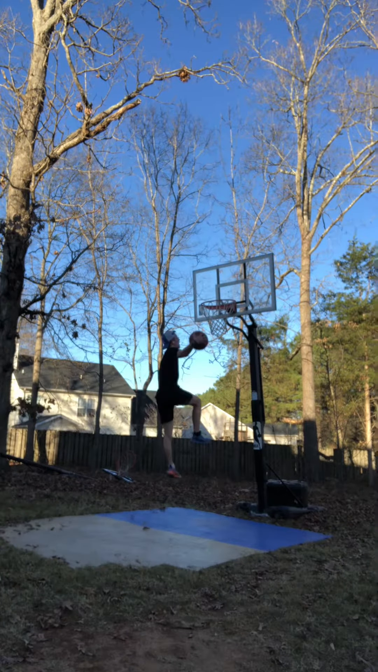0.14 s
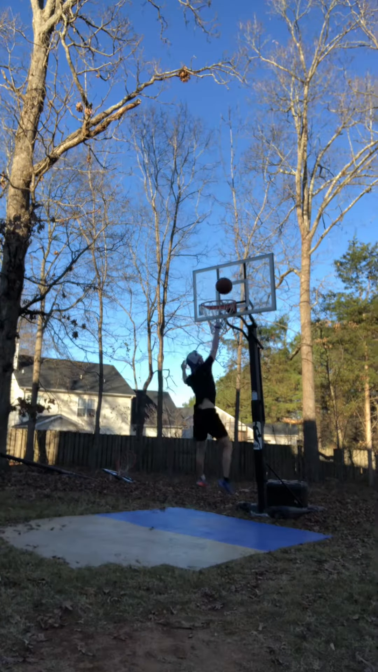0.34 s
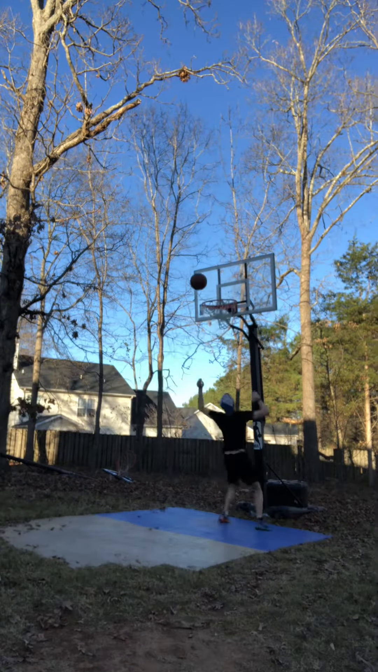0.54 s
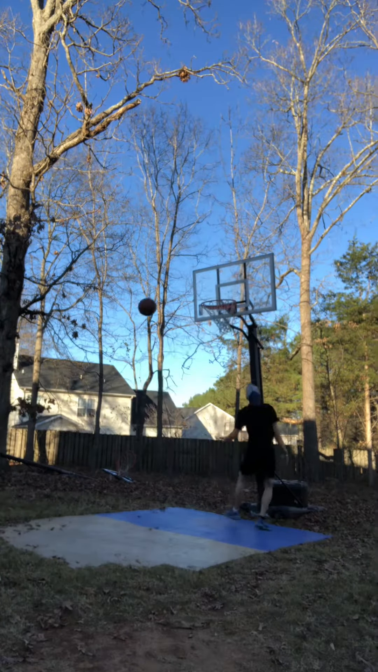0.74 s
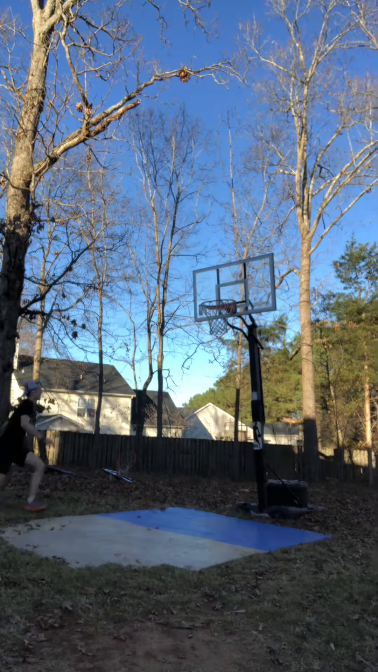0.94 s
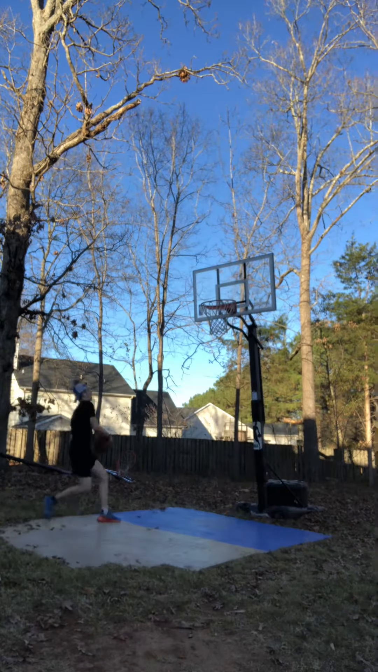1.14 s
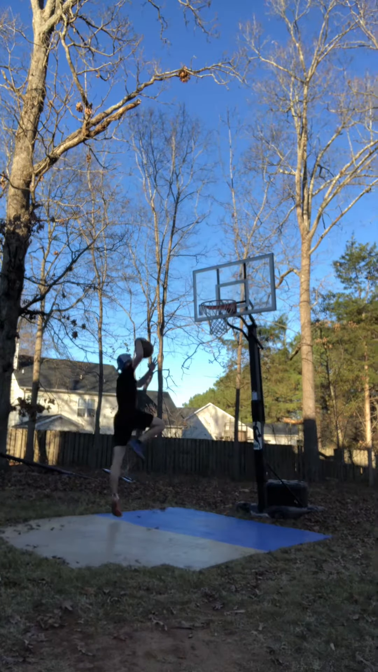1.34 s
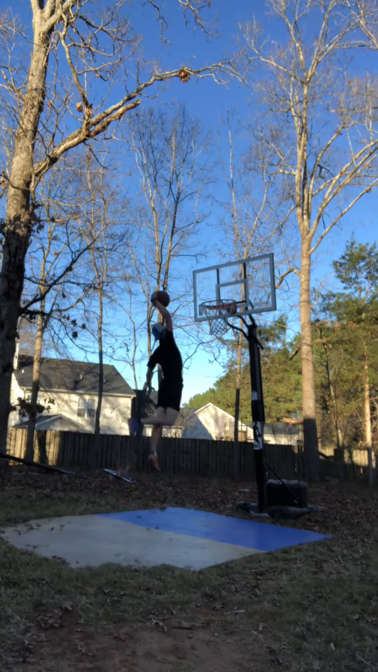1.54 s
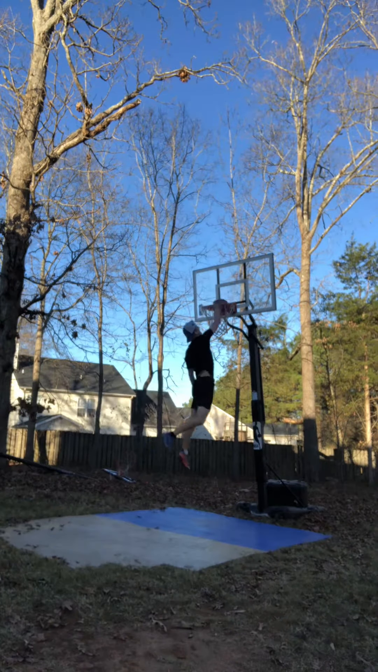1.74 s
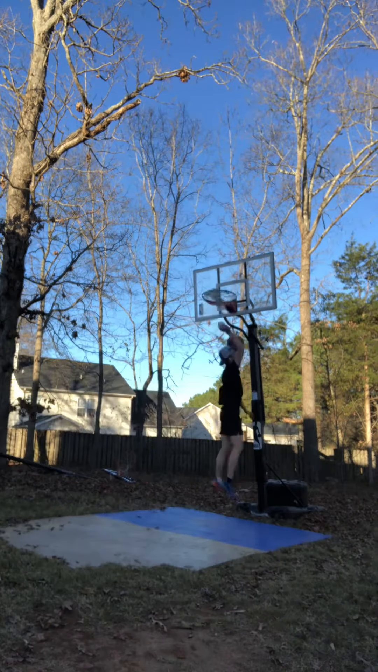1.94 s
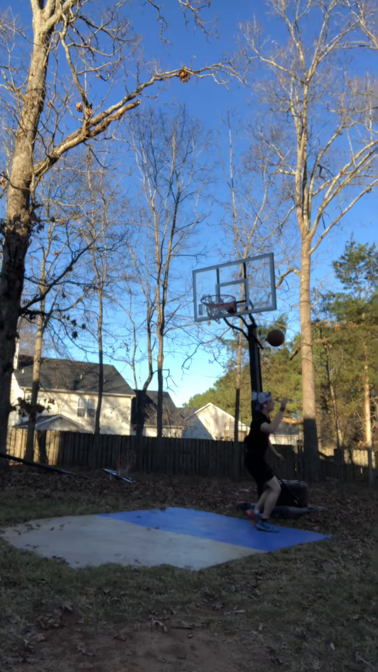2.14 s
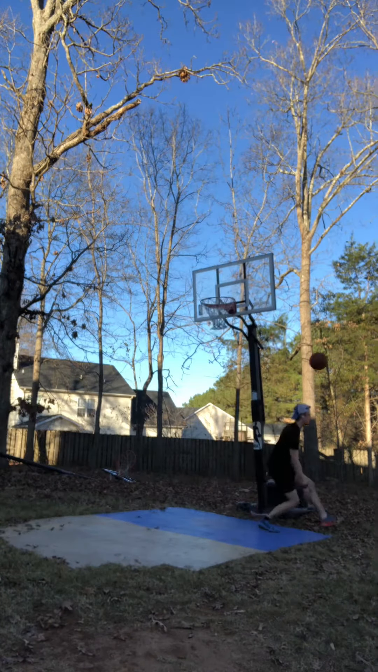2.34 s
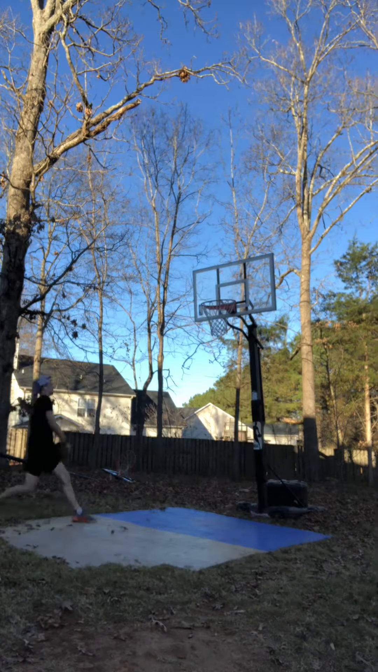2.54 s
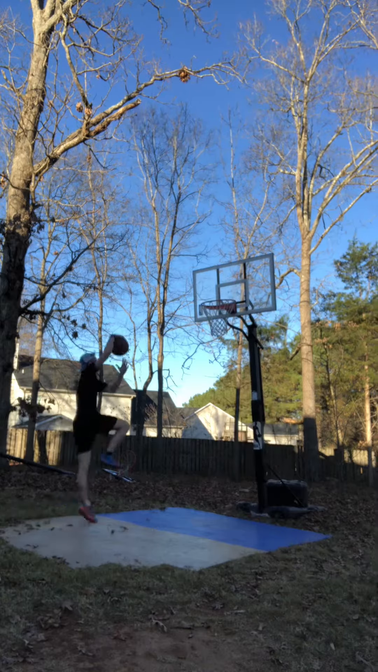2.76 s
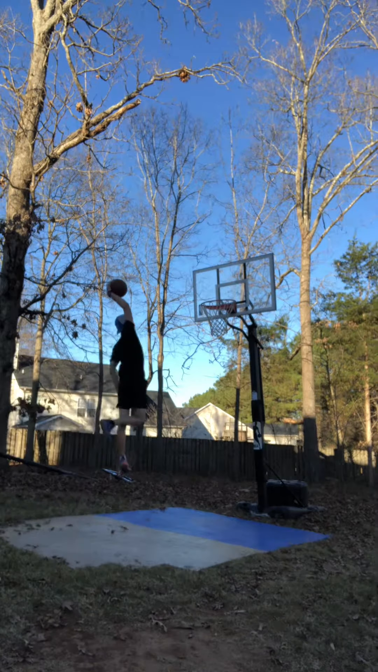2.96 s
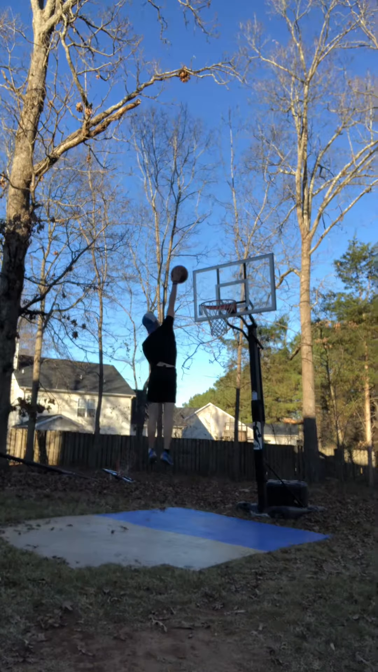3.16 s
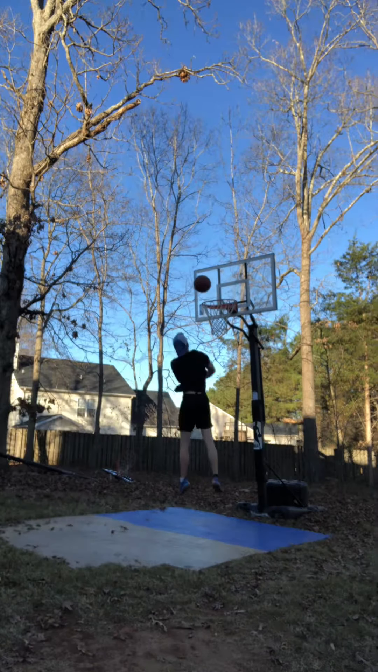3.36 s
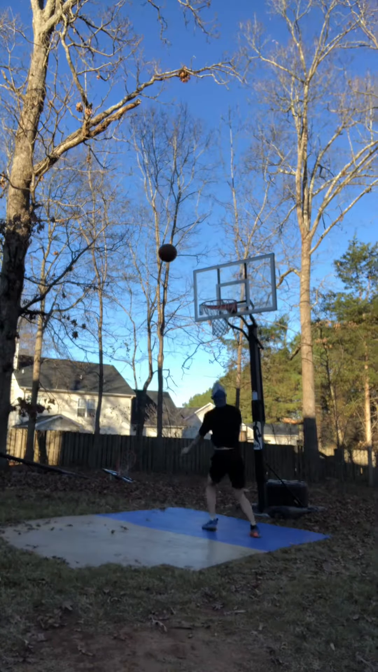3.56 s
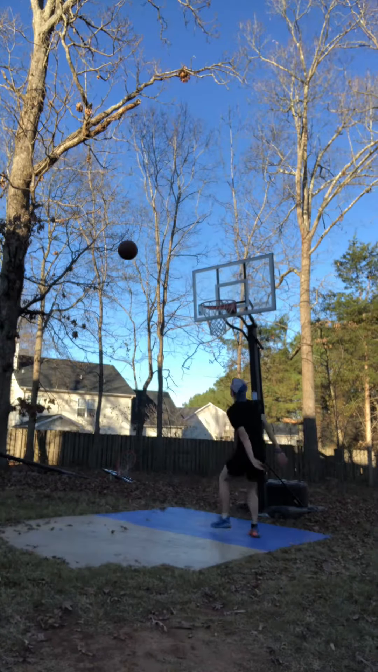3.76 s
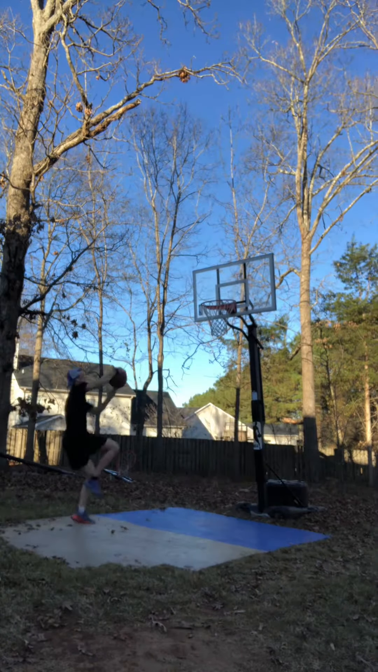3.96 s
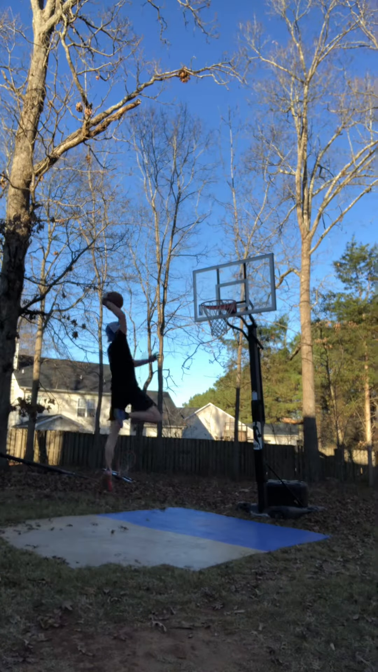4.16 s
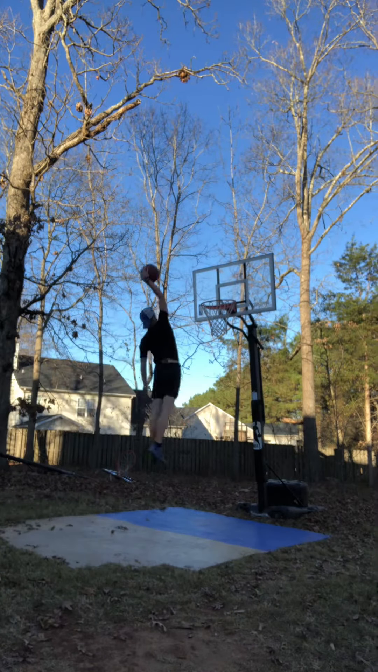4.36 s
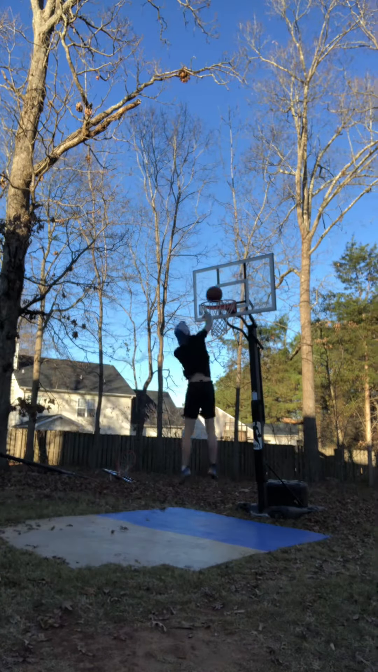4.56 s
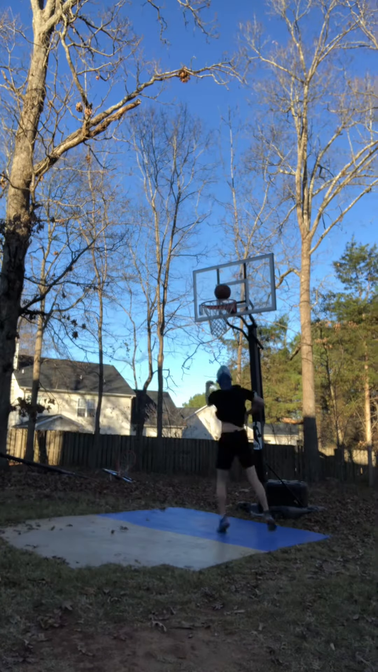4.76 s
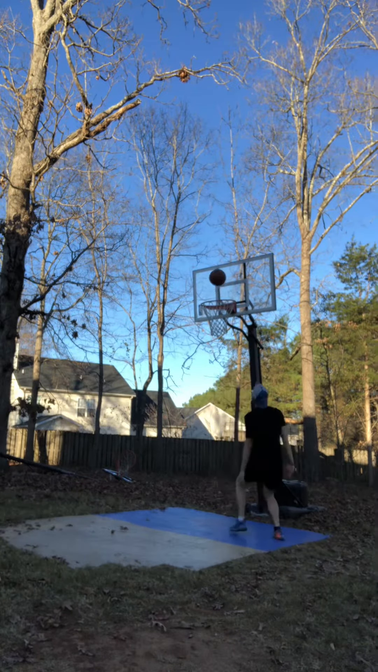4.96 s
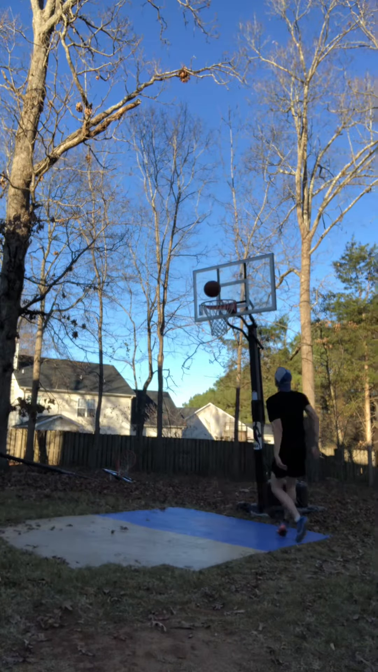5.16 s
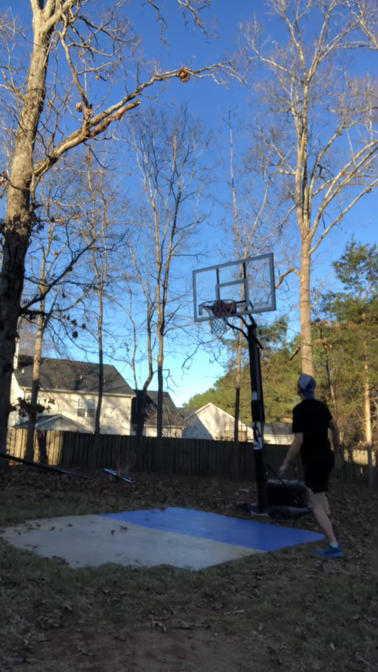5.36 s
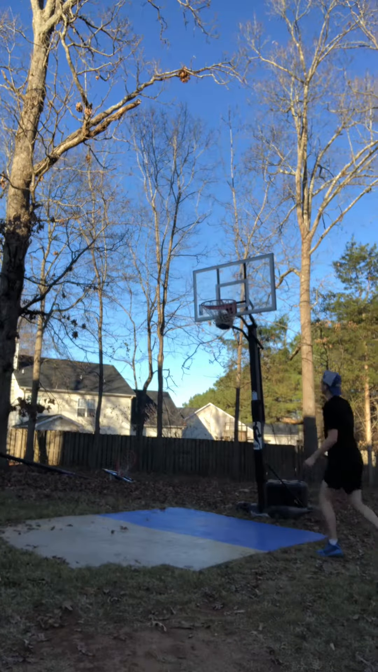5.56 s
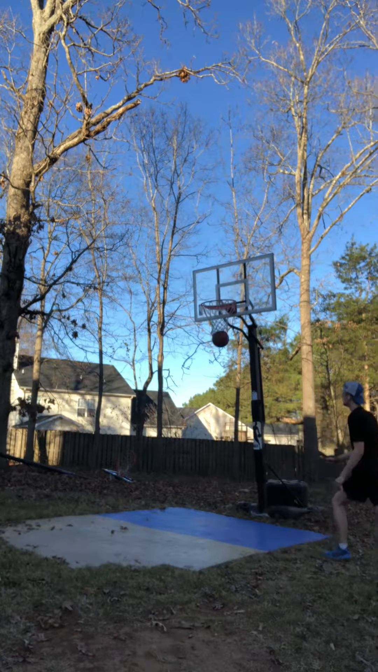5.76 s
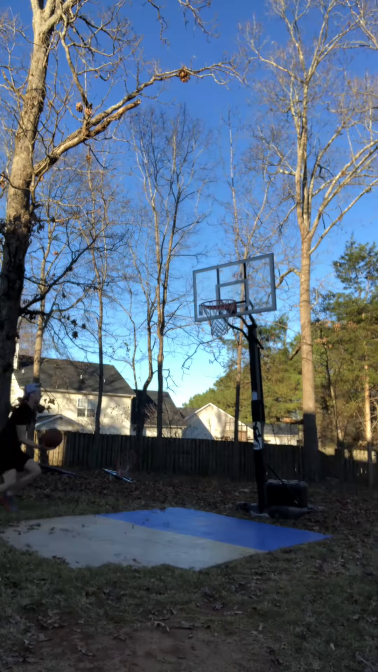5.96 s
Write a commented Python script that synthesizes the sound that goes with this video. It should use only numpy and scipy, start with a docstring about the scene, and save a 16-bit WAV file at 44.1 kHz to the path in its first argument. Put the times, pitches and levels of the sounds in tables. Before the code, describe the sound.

In a backyard, a ball repeatedly slams a steel rim and booming board, loose parts rattling on, with leaf-crunching run-ups abruptly cut between.

```python
"""A yard: a ball strikes a portable hoop. Ball and hand hit the steel rim, the plastic board booms, the pole hums and
loose joints rattle on; noise bursts and jolt envelopes drive resonances. Shoes crunch dry leaves (dense ticks, single
cracks) and thud on a concrete slab (click, damped thud). Rush, rumble and hiss are shaped noise. The background steps
between levels; in three gaps the hoop is cut to silence."""
import sys
import numpy as np
from scipy import signal
from scipy.fft import rfft, irfft, next_fast_len
from scipy.io import wavfile
from scipy.ndimage import uniform_filter1d

SR = 44100
rng = np.random.default_rng(int(sys.argv[2]) if len(sys.argv) > 2 else 0)


def put_to_file(sound):
    """Save the sound as 16-bit audio at rate SR, in the file named by the first command-line argument."""
    columns = np.atleast_2d(sound).T  # one column per channel
    safe = np.clip(columns, -1, 1)
    whole_steps = np.round(safe * 32767)
    wavfile.write(sys.argv[1], SR, whole_steps.astype(np.int16))


N = 264600  # samples

# Steel rim modes. Each row: frequency in Hz, width in Hz before RING_DAMPING, relative level in dB.
RIM_MODES = [(1240, 73, -5), (1884, 37, -16), (2260, 70, 6.5), (2700, 20, 11.5), (3195, 180, 0.5),
             (4060, 40, -5), (4530, 80, 0), (5090, 96, -6), (5256, 28, 6), (6100, 170, -6.5),
             (6350, 71, -4), (6720, 37, -4), (7200, 69, -6), (7805, 46, -16)]
# Jolts that set the whole frame shaking. Each row: start in seconds, joint rattle, board boom, pole hum in dB.
FRAME_JOLTS = [(0.33, -55.5, -42, -43), (0.43, -50.5, -48, -35), (1.769, -39, -43.5, -34.5),
               (2.045, -42, -46, -34), (2.25, -51.5, -38, -35), (3.285, -45, -38, -33.5),
               (4.69, -44, -40.5, -39), (5.26, -51, -40, -40)]
# Spectrum of the yard's rush. Each row: frequency in Hz, relative density in dB per Hz.
RUSH_SPECTRUM = [(150, -36), (250, -5), (559, -2), (690, -1.5), (727, -3.5), (851, -1.5), (2190, -14),
                 (11700, -34.5), (16400, -38)]
# Spectrum of the low rumble. Each row: frequency in Hz, relative density in dB per Hz.
RUMBLE_SPECTRUM = [(15, -44.5), (25, -4), (65, 1.5), (113, 2), (146, -5), (237, -7), (310, -15),
                   (400, -17.5), (520, -41), (880, -120)]

# Contact: first instant of a 1 ms contact over its chatter; treble re blow.
CLICK_DB, TREBLE_DB = 12.5, -16
# Treble gained per dB of ring level, and per dB that a blow is stronger than a medium one.
TREBLE_PER_RING_DB, HARDENING, MEDIUM_BLOW_DB = 0.21, 0.35, -19
# Each contact lands elsewhere on the rim: standard deviations of mode level and relative frequency.
MODE_SCATTER_DB, MODE_DETUNE = 2.5, 0.009
RING_DAMPING = 1.8  # width factor: a hand or ball on the rim widens its modes
# Loose steel chattering on after each contact: level re ring, decay, treble re chatter.
CLATTER_DB, CLATTER_T60_S, CLATTER_TREBLE_DB = -10, 0.11, -6.5
# Frame shaking after jolts: rise time constant, decays.
SHAKE_RISE_S, RATTLE_T60_S, BOOM_T60_S, HUM_T60_S = 0.049, 1.355, 1.38, 1.43
WASH_DB, GROWL_DB = 1.5, -1.5  # blurred noise with the rattle and with the hum, re each
HEEL_DB = 12.5  # first instant of a 1 ms step over its scuff
PRESS_DB_PER_S, LIFT_DB_PER_S = 898, 512  # swell and fade of a crunch
DRONE_HZ, DRONE_DB = 237.4, -58.5
FLOOR_PATCHY_DB = 0.8
LOW_CUT_HZ, TOP_HZ = 58.4, 15900


def amp(db):
    """dB to amplitude."""
    return 10 ** (np.asarray(db) / 20)


def unit(x):
    """Scale to rms 1."""
    return x / np.sqrt(np.mean(x ** 2) + 1e-20)


def along(points, hz):
    """Interpolate (Hz, value) points on a log frequency axis."""
    f, v = np.transpose(points)
    return np.interp(np.log(hz + 1), np.log(f + 1), v)


def filtered(x, response):
    """x times a complex response of frequency."""
    m = next_fast_len(N + SR // 2)
    return irfft(rfft(x, m) * response(np.fft.rfftfreq(m, 1 / SR)), m)[..., :N]


def add_at(track, start_s, sound):
    """Mix a sound into a track in place."""
    track[round(start_s * SR):][:len(sound)] += sound


def modes(table):
    """Causal response of resonances (Hz, width Hz, dB) with alternating signs."""
    def response(f):
        total = 0
        for k, (centre, width, db) in enumerate(table):
            total = total + (-1) ** k * amp(db) * 1j * f * width / (centre ** 2 - f ** 2 + 1j * f * width)
        return total
    return response


def colour(points):
    """Minimum-phase response with the given spectrum, by folding the cepstrum."""
    def response(f):
        cepstrum = irfft(np.log(amp(along(points, f)) + 1e-6))
        half = len(cepstrum) // 2
        cepstrum[1:half] *= 2
        cepstrum[half + 1:] = 0
        return np.exp(rfft(cepstrum))
    return response


def soft(corner_hz):
    """Causal two-pole low-pass: a yielding contact."""
    return lambda f: 1 / (1 + 1j * f / corner_hz) ** 2


def level(response):
    """Scale a response to rms gain 1 over frequency."""
    def scaled(f):
        h = response(f)
        return h / np.sqrt(np.mean(np.abs(h) ** 2))
    return scaled


def peaked(response):
    """Scale a response to an impulse response of peak 1."""
    def scaled(f):
        h = response(f)
        return h / np.abs(irfft(h)).max()
    return scaled


def ticks(per_s, spread_db, bed):
    """Random contacts of scattered size over a bed of noise, rms 1."""
    hits = rng.random(N) < per_s / SR
    sizes = amp(spread_db * np.clip(rng.standard_normal(N), -2, 2))
    sparse = hits * sizes * rng.choice([-1, 1], N)
    return unit(unit(sparse) + bed * rng.standard_normal(N))


def patchy(spectrum, patchy_db):
    """Coloured noise of rms 1 with soft patches of gain in time and frequency."""
    z = signal.stft(rng.standard_normal(N), nperseg=512)[2]
    field = uniform_filter1d(rng.standard_normal(z.shape), 5, 0)
    field = uniform_filter1d(field, 12, 1)
    noise = signal.istft(z * amp(patchy_db * unit(field)), nperseg=512)[1][:N]
    return unit(filtered(noise, colour(spectrum)))


def air():
    """Rush and rumble of far traffic and wind, stepping in level, with microphone hiss and an early faint drone."""
    # Each row: start in seconds, rush level in dB, rumble level in dB.
    air_levels = [(0.0, -62, -55.5), (0.822, -66.5, -57.5), (2.366, -66, -58.5), (3.88, -68, -60.5)]
    starts, rush_db, rumble_db = np.transpose(air_levels)
    stretch = np.maximum(np.searchsorted(starts, np.arange(N) / SR, "right") - 1, 0)
    rush = amp(rush_db[stretch]) * patchy(RUSH_SPECTRUM, FLOOR_PATCHY_DB)
    rumble = amp(rumble_db[stretch]) * patchy(RUMBLE_SPECTRUM, patchy_db=3.0)
    hiss = amp(-72.5) * patchy([(300, -16.0), (4000, -10.5), (16000, -22)], FLOOR_PATCHY_DB)
    hum = unit(filtered(rng.standard_normal(N), modes([(DRONE_HZ, 6, 0)])))
    drone = amp(DRONE_DB) * (stretch == 0) * hum
    return rush + rumble + hiss + drone


def leaves():
    """Dense crackle under the shoe, with single louder cracks, each of its own pitch."""
    # Shoes pressing dry leaves. Each row: start in seconds, hold in seconds, level in dB.
    treads = [(0.0, 0.033, -65), (0.175, .1, -63), (0.333, 0.0033, -53), (0.837, 0.038, -65),
              (0.916, 0.055, -54), (1.005, 0.074, -63), (1.12, 0.0061, -56.5), (1.159, 0.012, -57.5),
              (1.19, 0.072, -65), (1.397, 0.04, -61), (2.55, 0.0059, -47.5), (2.592, 0.049, -47),
              (2.766, 0.018, -61), (3.118, 0.018, -63), (3.22, 0.013, -74), (3.899, .01, -48),
              (3.929, 0.0062, -47), (3.98, 0.052, -62.5), (4.074, 0.026, -61.5), (4.232, 0.014, -69.5),
              (4.354, 0.12, -69), (5.708, 0.031, -48), (5.834, 0.042, -52.5), (5.987, 0.032, -46.5)]
    # Single leaves cracking. Each row: start in seconds, level in dB, pitch in Hz.
    snap_events = [(0.184, -45, 5880), (0.838, -45.5, 4170), (0.9213, -41, 9460), (0.9323, -32, 9500),
                   (0.9549, -32.5, 5440), (0.972, -31, 9420), (0.9894, -37, 7100), (1.1546, -31, 4930),
                   (2.702, -43, 3460), (2.7656, -43.5, 7650), (2.917, -48, 8400), (3.8841, -40, 6900),
                   (3.9689, -32.5, 7700), (4.0023, -41, 4400), (4.0766, -62, 3400), (4.2313, -44.5, 7200),
                   (5.729, -32, 9140), (5.7444, -23, 3830), (5.8407, -33.5, 5370), (5.9771, -27, 8500)]
    # Crackle spectrum. Each row: frequency in Hz, relative density in dB per Hz.
    crunch_spectrum = [(350, -29), (600, 5.5), (1470, 4), (1690, 1), (2710, -3.5), (3200, -3), (9540, -8),
                       (15300, -13), (16400, -12)]
    now = np.arange(N) / SR
    press = np.zeros(N)
    for s, hold, db in treads:
        before, after = np.maximum(s - now, 0), np.maximum(now - s - hold, 0)
        press += amp(db - PRESS_DB_PER_S * before - LIFT_DB_PER_S * after)
    crackle = ticks(per_s=1700, spread_db=5.5, bed=0.38)
    crackle = unit(filtered(crackle, colour(crunch_spectrum))) * press

    snaps, t = np.zeros(N + SR), np.arange(SR // 50) / SR
    for s, db, hz in snap_events:
        scatter = uniform_filter1d(rng.standard_normal(len(t)), size=5)
        add_at(snaps, s, amp(db) * scatter * np.sin(2 * np.pi * hz * t) * np.exp(-t / 0.0034))
    return crackle + snaps[:N]


def steps():
    """A dull click of the sole and a short scuffing thud of the slab, a noise-driven damped resonance."""
    # Each row: start in seconds, level in dB, thud peak re level in dB, thud pitch in Hz, scuff decay in seconds.
    footfalls = [(1.0835, -20, -19, 566, 0.0017), (1.123, -34.5, 3, 347, 0.0088),
                 (1.1925, -50, 5, 227, 0.0033), (1.242, -39.5, -16, 400, 0.0054),
                 (1.334, -42, -11, 124, 0.0098), (1.405, -55, 3, 132, .008), (2.552, -25, -11, 484, .0012),
                 (2.5839, -38.5, 7, 603, .005), (2.631, -29.5, -12.5, 417, 0.0084),
                 (2.783, -36, -14, 506, 0.0033), (2.889, -40.5, -11, 610, 0.0033),
                 (3.12, -24.5, -13.5, 660, 0.0017), (3.2148, -49, -8, 437, .006),
                 (3.9098, -19.5, -6.5, 320, 0.0016), (3.927, -27, -6.5, 151, 0.0056),
                 (4.209, -49.5, 3, 370, .003), (4.421, -64, 11, 149, .003), (4.543, -66.5, 11, 440, .005),
                 (5.6827, -30.5, -13, 416, .003), (5.7473, -22, -25, 410, 0.0013)]
    slaps, thuds, t = np.zeros(N + SR), np.zeros(N + SR), np.arange(SR // 10) / SR
    for s, db, thud_db, hz, scuff_s in footfalls:
        scuff, push = rng.standard_normal((2, len(t)))
        scuff[0] = amp(HEEL_DB) / (1000 * scuff_s)
        add_at(slaps, s, amp(db) * scuff * np.exp(-t / scuff_s))
        resonance = np.exp((-hz * 2.0 + 2j * np.pi * hz) / SR)
        thud = signal.lfilter([1], [1, -resonance], push * t * np.exp(-t / 0.0049)).imag
        add_at(thuds, s, amp(db + thud_db) * thud / np.abs(thud).max())
    dull = filtered(slaps[:N], lambda f: soft(corner_hz=4200)(f) ** 2 * 1j * f / (400 + 1j * f))
    return thuds[:N] + dull


def hard_contact(f):
    """Broad colour of a hard contact."""
    # Each row: frequency in Hz, relative density in dB per Hz.
    clack_spectrum = [(290, -23), (500, -14), (621, -14), (1140, -10), (1400, -7.5), (2070, -8.5),
                      (2650, -12), (2930, -9.5), (7100, -24.5), (16000, -65)]
    return colour(clack_spectrum)(f)


def contact_treble(f):
    """Upper part of a hard contact."""
    return hard_contact(f) * (1 - soft(corner_hz=9000)(f)) ** 2


def plastic_board(f):
    """Board resonances behind a yielding contact."""
    # Each row: frequency in Hz, width in Hz, relative level in dB.
    board_modes = [(227.4, 19, -4), (308.8, 30, -7.5), (359.6, 23.2, -3.5), (418.6, 43, -0.5),
                   (446.7, 18.8, 4), (466, 31, 3.5), (566, 74.7, -2.5), (680, 49, -10), (927.6, 48.5, -4)]
    return modes(board_modes)(f) * soft(corner_hz=1200)(f)


def pole_tube(f):
    """Low pole resonances, band-limited."""
    # Each row: frequency in Hz, width in Hz, relative level in dB.
    pole_modes = [(71.2, 8.5, 4.5), (110, 14, -10), (120.6, 39.5, 5)]
    return modes(pole_modes)(f) * soft(corner_hz=200)(f) * (1j * f / (45 + 1j * f)) ** 2


def shaking(levels_db, t60_s):
    """Every jolt adds shaking that builds up quickly and dies away; powers add."""
    starts = np.transpose(FRAME_JOLTS)[0][:, None]
    age = np.maximum(np.arange(N) / SR - starts, 0)
    envelopes = amp(levels_db[:, None] - 60 * age / t60_s) * (1 - np.exp(-age / SHAKE_RISE_S))
    return np.sqrt(np.sum(envelopes ** 2, axis=0))


def shaken_frame():
    """Jolts rattle loose joints, boom the board and hum the pole, with blurred noise."""
    _, joints_db, boom_db, hum_db = np.transpose(FRAME_JOLTS)
    joints = shaking(joints_db, RATTLE_T60_S)
    boom = shaking(boom_db, BOOM_T60_S)
    hum = shaking(hum_db, HUM_T60_S)
    loose = joints * ticks(per_s=290, spread_db=7, bed=0.62)
    shake = amp(-6) * filtered(loose, level(hard_contact))
    shake += amp(-4.5) * filtered(loose, level(modes(RIM_MODES)))
    shake += filtered(boom * ticks(per_s=260, spread_db=6.0, bed=0.6), level(plastic_board))
    shake += filtered(hum * rng.standard_normal(N), level(pole_tube))
    shake += amp(WASH_DB) * joints * patchy(RUSH_SPECTRUM, patchy_db=3.5)
    shake += amp(GROWL_DB) * hum * patchy(RUMBLE_SPECTRUM, patchy_db=7.0)
    return shake


def contact_burst(length_s):
    """Click, stronger for short contacts, then decaying noise chatter."""
    t = np.arange(SR // 10) / SR
    burst = rng.standard_normal(len(t)) * np.exp(-t / length_s) * (1 - np.exp(-t / (0.36 * length_s)))
    burst[0] = amp(CLICK_DB) / (1000 * length_s) ** 2
    return burst


def struck_spot():
    """Rim modes as excited at one random spot."""
    spot = []
    for hz, width, db in RIM_MODES:
        detune, scatter = rng.standard_normal(2)
        spot.append((hz * (1 + MODE_DETUNE * detune), width * RING_DAMPING, db + MODE_SCATTER_DB * scatter))
    return spot


def struck_hoop():
    """Contact bursts drive rim, board and pole; loose steel clatters after each."""
    # Each row: start in seconds, level in dB, board, pole and steel ring re level in dB, contact length in seconds.
    blows = [(0.254, -52.5, 10, 10, -12, .005), (0.322, -43, 13, -1, 0, 0.0045),
             (0.422, -14, -5, 0.5, -3, 0.0014), (0.494, -22.5, -24, 2, -17, 0.0011),
             (0.509, -18.5, -4.5, -9, -12.5, 0.0013), (0.531, -33, 6.5, -12, -2.5, 0.0059),
             (0.62, -40, -7, 0, -6.5, 0.0068), (0.674, -37, 2.5, -9, -0.5, 0.0042),
             (0.813, -43.5, -18, 2, -6, 0.0032), (1.718, -27.5, -1.5, -17, -4, .003),
             (1.732, -37.5, 4, 5, 3, 0.0074), (1.75, -33, 13, -12, -0.5, 0.012),
             (1.764, -18, 9, 1.5, 0.5, 0.0055), (1.847, -28, 8, 5, -8, 0.01),
             (1.857, -21.5, 8.5, -19, 1, 0.0036), (1.904, -30, -9, 7.5, 2, 0.0053),
             (1.915, -33.5, 4, -12, 7.5, 0.0055), (1.995, -38.5, -1, -11, 7.5, .005),
             (2.039, -17, -5.5, -40, 2.5, 0.006), (2.047, -17, -1, -41, -5.5, 0.0045),
             (2.104, -17.5, -3, -20, -13, 0.0034), (2.181, -39.5, 3, -17, 6, 0.0048),
             (2.247, -26.5, 2.5, -22, 6, 0.01), (2.317, -27.5, 0.5, -8, -14, 0.0053),
             (3.276, -10, -4, -9.5, -9, 0.0019), (3.286, -22.5, -1, -9, -16, 0.0028),
             (3.293, -14.5, -10, -6.5, -17, 0.0021), (3.308, -34.5, -18, 15.5, 1, 0.0039),
             (3.37, -29, 4, -13, -3.5, 0.0086), (3.434, -45, -11, 11, 4, 0.0052),
             (3.489, -25.5, -3.5, -5, -21, 0.0013), (3.5, -34, -5, -10, -16, 0.002),
             (3.513, -26.5, -13, -1, -18, 0.002), (3.524, -32, -18, -10, -19, 0.0012),
             (3.537, -37, -21, -12, -10, 0.0039), (3.551, -27, -0.5, -2.5, -15, 0.002),
             (3.639, -40, -4, 1, -16, 0.005), (3.751, -41, 1.5, -4, -6.5, 0.0044),
             (4.629, -13.5, -2.5, -13.5, -12, 0.0019), (4.644, -27.5, -2, 6.5, -41, 0.0022),
             (4.677, -14.5, -6.5, -4, -6, 0.0017), (4.688, -20.5, -11, -4, 4, 0.0048),
             (4.695, -14, -9, -20, 1, 0.0029), (4.708, -22.5, 3, -16, 1, 0.0064),
             (4.719, -22.5, 7, -13, -2, 0.0051), (4.785, -25.5, -5.5, 0, -11, 0.0019),
             (4.814, -22, -5, -5.5, -7, 0.0034), (4.851, -29, -13, -3, -23, 0.0015),
             (4.889, -34, 4.5, -9, -17, .005), (4.96, -37.5, -3, -15, -7.5, 0.0043),
             (5.251, -25.5, -6, -31, -13, 0.0019), (5.263, -33.5, 1, 2, -3.5, 0.0032),
             (5.311, -30.5, -3.5, 0, -7.5, 0.0052), (5.403, -32, -4, -16, 0, 0.0034),
             (5.465, -36, -2, -16, -5.5, 0.005), (5.556, -50.5, 11.5, 2.5, -20.5, .004),
             (5.608, -43.5, 2.5, 2.5, 0.5, 0.0036)]
    hz, age = np.fft.rfftfreq(SR // 2, 1 / SR), np.arange(SR // 2) / SR
    knock, bright, ring, board, pole, clatter_power = np.zeros((6, N + SR))
    for s, db, board_db, pole_db, ring_db, length_s in blows:
        burst = contact_burst(length_s)
        add_at(knock, s, amp(db) * burst)
        treble_db = TREBLE_DB + TREBLE_PER_RING_DB * ring_db + HARDENING * (db - MEDIUM_BLOW_DB)
        add_at(bright, s, amp(db + treble_db) * burst)
        rung = irfft(rfft(burst, SR // 2) * level(modes(struck_spot()))(hz))
        add_at(ring, s, amp(db + ring_db) * rung)
        fade = amp(db + ring_db + CLATTER_DB - 60 * age / CLATTER_T60_S)
        add_at(clatter_power, s, (fade * (1 - np.exp(-age / length_s))) ** 2)
        add_at(board, s, amp(db + board_db) * burst / np.linalg.norm(burst))
        pole[round((s + 0.005) * SR)] += amp(db + pole_db)  # answers once the bracket is loaded

    contact_body = lambda f: hard_contact(f) * soft(corner_hz=4000)(f)
    struck = filtered(knock[:N], level(contact_body)) + filtered(bright[:N], level(contact_treble))
    struck += ring[:N]
    struck += filtered(board[:N], peaked(plastic_board)) + filtered(pole[:N], peaked(pole_tube))
    clatter = np.sqrt(clatter_power[:N]) * ticks(per_s=900, spread_db=7.5, bed=0.42)
    struck += filtered(clatter, level(hard_contact))
    struck += amp(-10.5) * filtered(clatter, level(modes(RIM_MODES)))
    struck += amp(CLATTER_TREBLE_DB) * filtered(clatter, level(contact_treble))
    return struck


def yard(x, echo_delay_s):
    """The ground's echo and a weak scattered tail from fence and houses."""
    # Each row: frequency in Hz, 60 dB decay time in seconds.
    tail_decay = [(200, 0.41), (2000, 0.46), (10000, 0.11)]
    hz, t, z = signal.stft(rng.standard_normal(SR // 2), SR, nperseg=256)
    decay = amp(-60 * t / along(tail_decay, hz)[:, None])
    tail = signal.istft(z * decay, SR, nperseg=256)[1]
    wet = signal.fftconvolve(np.pad(x, (700, 0)), tail / np.linalg.norm(tail))[:N]  # 700-sample predelay
    echo = np.pad(x, (round(echo_delay_s * SR), 0))[:N]
    return x + 0.38 * echo + amp(-13) * wet


def scene():
    """Hoop with silent gaps, steps, leaves and air, summed to one channel."""
    # Gaps where the hoop is silent. Each row: start in seconds, end in seconds.
    silent_gaps = [(0.822, 1.7), (2.366, 3.2), (3.88, 4.6)]
    t, hoop_gate = np.arange(N) / SR, np.ones(N)
    for start, end in silent_gaps:
        hoop_gate[(t > start) & (t < end)] = 0
    hoop = hoop_gate * yard(struck_hoop() + shaken_frame(), echo_delay_s=0.002753)
    footsteps = yard(steps(), echo_delay_s=0.00044)
    return (air() + leaves() + footsteps + hoop)[None]


def record(dry):
    """The microphone rolls off the deep bass and keeps nothing above its band limit."""
    return filtered(dry, lambda hz: (1j * hz / (LOW_CUT_HZ + 1j * hz)) ** 2 * (hz < TOP_HZ))


dry = scene()
out = record(dry)
put_to_file(out)
```